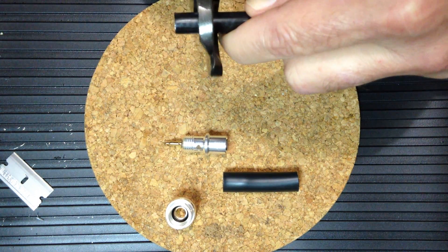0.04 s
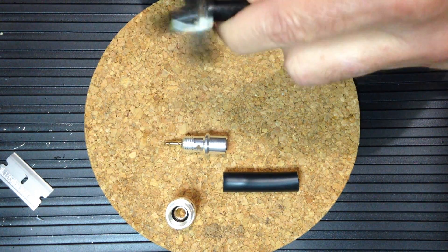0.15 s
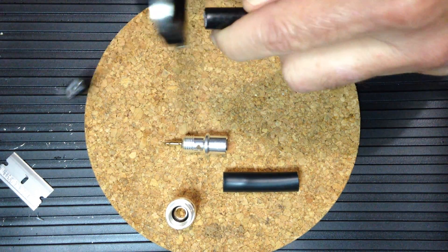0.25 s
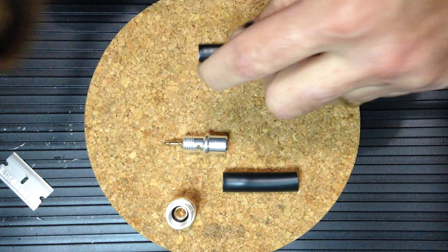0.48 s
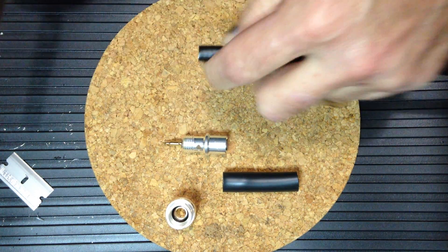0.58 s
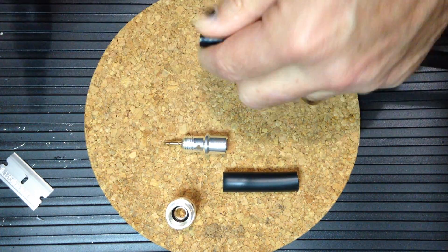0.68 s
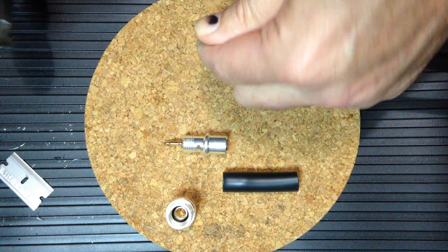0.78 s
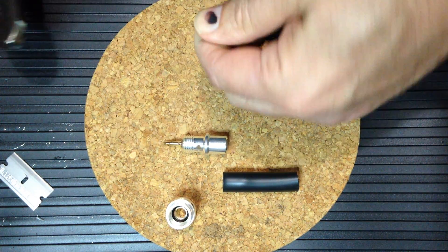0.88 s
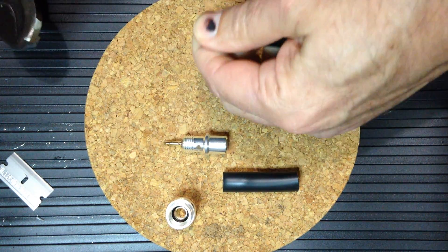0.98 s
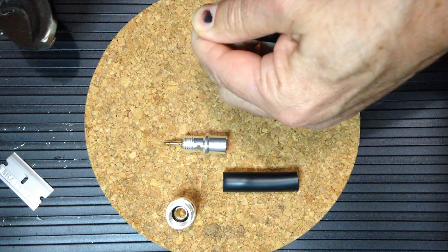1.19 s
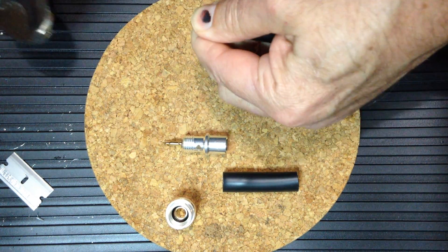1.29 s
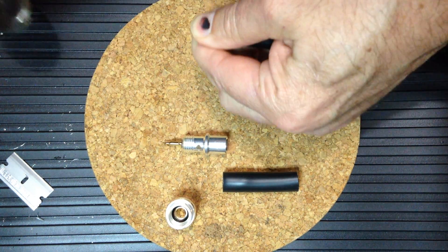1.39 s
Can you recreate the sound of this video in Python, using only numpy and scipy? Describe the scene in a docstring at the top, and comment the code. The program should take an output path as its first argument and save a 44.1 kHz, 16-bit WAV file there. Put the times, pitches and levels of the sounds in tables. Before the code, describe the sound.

Hand cutters crunch briefly into a thick cable and snap through at about 0.25 seconds, sharp and bright, the steel ringing briefly in a small room. The offcut knocks onto the bench mat and tumbles around 0.4 seconds. From 0.5 to 0.7 the cable ticks and creaks softly in the fingers. Faint taps and a soft bump follow near 1.1 seconds, over a low room hum.

```python
"""A faint tick, a short crunch, then a sharp snap: hand cutters bite through a thick coaxial cable.
The braid breaks strand by strand; the jaws shut and chatter, and their steel and a small live room ring.
The offcut lands on the workbench mat and tumbles, each impact exciting the modes of mat and bench.
Then the cable ticks and creaks softly in the fingers, over a low room hum."""
import sys
import numpy as np
from scipy import signal
from scipy.fft import rfft, irfft, next_fast_len
from scipy.io import wavfile

SR = 44100
rng = np.random.default_rng(int(sys.argv[2]) if len(sys.argv) > 2 else 0)


def generate_wav(signal):
    """Clip the signal to [-1, 1] and save it as 16-bit WAV at the path in sys.argv[1]."""
    frames = np.transpose(np.atleast_2d(signal))
    scaled = np.clip(frames, -1, 1) * 32767
    pcm = np.round(scaled).astype(np.int16)
    wavfile.write(sys.argv[1], SR, pcm)


N = 63945
TIME = np.arange(N) / SR


def snap():
    """Impulsive excitation: the jaws break through and chatter, the steel rings and the tool jerks."""
    # jaw impacts: t/s, level/dB, T60/s, bass edge/Hz, treble edge/Hz
    impacts = [(.2359, -15, .014, 2500, 15000), (0.2371, -4.5, .018, 255.6, 15430),
               (.2388, -19.5, .014, 2464, 10000), (.2424, -10, .015, 2200, 8000),
               (.2462, -13, .014, 2200, 5500), (.2481, -16, .013, 2512, 4800)]
    # spectrum of the cracks: f/Hz, level/dB
    crack_spectrum = [(150, -12.5), (400, -12), (900, -6), (1300, -10.5), (1650, -10), (2250, -13),
                      (2700, -15.5), (3600, -2), (4400, -6), (5200, -15.5), (6600, -1.5), (7400, -9),
                      (8700, -9), (11500, -16), (14000, -11)]
    # modes of the cutters: f/Hz, level/dB, T60/s
    steel_modes = [(1630, -31, .06), (2240, -27, .1), (3590, -15, .05), (3558, -23, .36), (3655, -37, .4),
                   (3747, -37, .45), (4395, -28, .18), (5770, -32, .08), (6503, -33, .36), (6691, -32, .42),
                   (7224, -42, .36), (8689, -41, .33)]
    cracks = np.zeros(N)
    for start, db, t60, bass_hz, treble_hz in impacts:
        burst = rng.choice([-1, 1], N) * from_db(db) * decay(start, t60)
        cracks += high_pass(low_pass(burst, treble_hz), bass_hz)
    blow = np.zeros(N)
    blow[int(impacts[1][0] * SR)] = 1  # the strongest impact rings the steel
    steel = sum((-1) ** k * from_db(db) * ring(blow, hz, t60)
                for k, (hz, db, t60) in enumerate(steel_modes))
    jolt_width_s, jolt_db = .004, -29
    u = (TIME - impacts[0][0]) / jolt_width_s
    jolt = from_db(jolt_db) * (u ** 2 - 1) * np.exp(-u ** 2 / 2)  # one low pulse as the cable gives
    return colour(cracks, crack_spectrum) + steel + jolt


def snap_reverberation():
    """Reverberation holds the colour of the steel; flutter echo between near walls ripples its decay."""
    # the room's answer to the snap: f/Hz, level/dB
    spectrum = [(60, -38.5), (150, -29), (400, -22.5), (900, -17.5), (1600, -12.5), (1900, -15.5),
                (2250, -8.5), (2900, -28), (3350, -6.5), (3650, -0.5), (4000, -4), (4400, -12), (5300, -16),
                (6000, -10), (6650, -2.5), (7100, -12), (8500, -11.5), (10500, -10.5), (15000, -12.5)]
    start_s, flutter_hz, flutter_depth = .241, 81, .15
    flutter = 1 + flutter_depth * np.cos(2 * np.pi * flutter_hz * (TIME - start_s))
    return from_db(-22.8) * colour(diffuse_field(start_s) * flutter, spectrum)


def crunch():
    """Acoustic emission: jacket and braid give way under the blades in many tiny fractures."""
    # pushes of the blades: t/s, duration/s, level/dB
    pushes = [(.160, 0.033, -62.5), (.1945, 0.0047, -33), (.1985, .011, -27.5), (.206, 0.0087, -34),
              (.214, .016, -41), (.2275, .007, -28.5)]
    # breaking strands: f/Hz, level/dB
    spectrum = [(120, -20.5), (350, -18), (750, -19), (980, -0.5), (1250, -22.5), (2200, -9), (2800, -6.5),
                (3800, -3.5), (5200, -11), (8500, -1), (11000, -9), (15000, -11.5)]
    return high_pass(friction(pushes, spectrum, grains_per_s=8600), edge_hz=248)


def offcut():
    """Impacts excite damped modes: the cut end lands and tumbles; later the bench takes a soft bump."""
    # knocks on the bench: t/s, level/dB, treble edge/Hz
    knocks = [(.3575, -15.5, 1200), (.3726, -0.5, 4800), (.3752, -13, 1550), (.3772, -12, 1740),
              (.3825, -9, 1080), (.389, -17, 500), (.448, -19.5, 2420), (.4905, -23, 1990),
              (1.128, -22.5, 197)]
    # modes of mat and bench: f/Hz, level/dB, T60/s
    bench_modes = [(119, -32, 0.15), (177.4, -26, 0.072), (255, -32, 0.057), (327, -25.5, 0.054),
                   (505, -22, 0.025), (647, -17.5, 0.01), (837, -29, 0.06), (1014, -25, 0.033),
                   (1278, -29.5, 0.059), (1563, -25.5, 0.018), (2570, -25.5, 0.0077), (4500, -23, 0.0073)]
    return in_room(high_pass(strike(knocks, bench_modes), edge_hz=104), wet_db=-10.5)


def cable_ticks():
    """Heavy damping makes each small impulse in the handled cable a short tick."""
    # ticks in the fingers: t/s, level/dB, treble edge/Hz
    ticks = [(.119, -29, 1000), (.5078, 0, 14000), (.5622, -9, 3000), (.5745, -20, 2000), (.586, -19, 2500),
             (.5953, -14, 5000), (.6025, -20, 4000), (.6207, -11.5, 1900), (.639, -14, 2500),
             (.6475, -13, 2300), (.6755, -17.5, 1800), (.968, -31, 1700), (.9822, -23, 1900),
             (.9925, -23, 1900), (1.095, -26, 2500), (1.102, -31, 2000), (1.153, -30, 2000)]
    # modes of the cable: f/Hz, level/dB, T60/s
    cable_modes = [(171.44, -43, 0.05), (490, -44, .015), (930.7, -37.5, 0.0078), (1266, -24.5, .022),
                   (1614, -27.5, 0.023), (2120, -28.5, .012), (2800, -27.5, 0.0038), (4700, -26, 0.0023),
                   (7500, -33.5, 0.0021), (11700, -38, 0.0009)]
    return in_room(strike(ticks, cable_modes), wet_db=-15)


def light_taps():
    """Small bodies have high natural frequencies: a wire end flicks and a hard part taps."""
    # contacts of the part and of the wire end: t/s, level/dB, treble edge/Hz
    taps = [(1.066, -3, 9000), (1.079, -6.5, 7000), (1.0915, -0.5, 3480)]
    flick = [(1.0365, -3, 14000)]
    # their modes: f/Hz, level/dB, T60/s
    part_modes = [(2085, -46.5, 0.029), (3020, -54.5, 0.023), (3910, -53, 0.012), (6830, -56, 0.013)]
    wire_modes = [(6720, -56, 0.028), (10870, -56, 0.0068)]
    return in_room(strike(taps, part_modes) + strike(flick, wire_modes), wet_db=-12.5)


def finger_rubs():
    """Sliding friction: skin catches and slips on the jacket."""
    # finger strokes: t/s, duration/s, level/dB
    strokes = [(.10, 0.037, -70.5), (.51, 0.15, -48.5), (.68, 0.24, -78), (.85, 0.24, -66.5),
               (1.02, 0.14, -64)]
    # skin on the jacket: f/Hz, level/dB
    spectrum = [(30, -26), (60, -11), (140, 3.5), (300, -5.5), (600, -14), (980, -7), (1250, 2), (1650, -2),
                (2100, -5), (4000, -14), (8000, -20), (14000, -35)]
    return friction(strokes, spectrum, grains_per_s=3800)


def room_tone():
    """Background noise: a continuous spectrum of rumble and hiss, with a line spectrum of hum."""
    # rumble and hiss: f/Hz, level/dB
    air_spectrum = [(20, -26.5), (40, -24.5), (65, -3.5), (90, -9), (125, -4.5), (180, -8.5), (260, -14),
                    (400, -20.5), (700, -25), (1400, -32.5), (3000, -38.5), (7000, -42), (15000, -42)]
    # hum tones: f/Hz, rms level/dB
    tones = [(68, -70.5), (119, -65), (399, -76)]
    gain = from_db(at_hz(air_spectrum, np.fft.rfftfreq(N, 1 / SR)))
    air = irfft(rfft(rng.standard_normal(N)) * gain, N)
    hum = sum(from_db(db) * np.sqrt(2) * np.sin(2 * np.pi * (hz * TIME + rng.random()))
              for hz, db in tones)
    return from_db(-59) * unit_rms(air) + hum


def strike(hits, modes, spread_db=1.0):
    """Modal superposition: each contact rings all modes; a soft one barely stirs the high ones."""
    starts, db, edge_hz = np.transpose(hits)
    scatter_db = spread_db * rng.standard_normal((len(hits), len(modes)))
    out = np.zeros(N)
    for k, (hz, mode_db, t60) in enumerate(modes):
        rolloff = np.hypot(1, (hz / edge_hz) ** 2)
        clicks = np.zeros(N)
        clicks[(starts * SR).astype(int)] = from_db(db + mode_db + scatter_db[:, k]) / rolloff
        out += (-1) ** k * ring(clicks, hz, t60)
    return out


def ring(clicks, hz, t60):
    """Damped oscillator: a unit impulse starts a decaying sine of amplitude 1."""
    radius, angle = np.exp(-np.log(1000) / (t60 * SR)), 2 * np.pi * hz / SR
    return signal.lfilter([0, np.sin(angle)], [1, -2 * radius * np.cos(angle), radius ** 2],
                          clicks + 1e-18)


def friction(strokes, spectrum, grains_per_s, spread_db=5.5):
    """Shot noise: dense tiny breaks of uneven size swell and fade under each stroke."""
    sizes = from_db(spread_db * np.minimum(rng.exponential(1, N), 4)) * rng.choice([-1, 1], N)
    grains = unit_rms(sizes * (rng.random(N) < grains_per_s / SR))
    force = sum(from_db(db) * np.sin(np.pi * np.clip((TIME - start) / length, 0, 1))
                for start, length, db in strokes)
    return colour(grains * force, spectrum)


def diffuse_field(start, rise_s=.014):
    """A diffuse field builds up, then decays at its own rate in each half octave."""
    # reverberation time of the room: f/Hz, T60/s
    room_t60 = [(200, 0.26), (1300, 0.53), (3700, 0.73), (6500, .61), (9000, .48), (14000, 0.15)]
    noise, hz = rfft(rng.standard_normal(N)), np.fft.rfftfreq(N, 1 / SR)
    centres = np.geomspace(125, 16000, 15)
    out = np.zeros(N)
    for centre, share in zip(centres, np.eye(len(centres))):
        band = irfft(noise * np.interp(hz, centres, share), N)
        out += band * decay(start, at_hz(room_t60, centre))
    return out * np.clip((TIME - start) / rise_s, 0, 1)


def in_room(x, wet_db):
    """Convolution with the room's impulse response adds reverberation to the direct sound."""
    response = unit_rms(diffuse_field(0)) / np.sqrt(N)
    return x + from_db(wet_db) * signal.fftconvolve(x, response)[:N]


def colour(x, spectrum):
    """Minimum-phase filter with the given spectral shape and unit power gain."""
    size = 2 * next_fast_len(N)
    gain = unit_rms(from_db(at_hz(spectrum, np.fft.rfftfreq(size, 1 / SR))))
    cepstrum = irfft(np.log(gain))
    cepstrum[1:size // 2] *= 2  # folding onto positive time makes the filter causal
    cepstrum[size // 2 + 1:] = 0
    return irfft(rfft(x, size) * np.exp(rfft(cepstrum)))[:N]


def low_pass(x, edge_hz):
    """Second-order roll-off above the edge."""
    return signal.sosfilt(signal.butter(2, edge_hz, fs=SR, output="sos"), x + 1e-18)


def high_pass(x, edge_hz):
    """Second-order roll-off below the edge."""
    return signal.sosfilt(signal.butter(2, edge_hz, "high", fs=SR, output="sos"), x + 1e-18)


def decay(start, t60):
    """Exponential decay: a jump to 1, then a fall of 60 dB per t60."""
    return (TIME >= start) * np.exp(-np.log(1000) * np.clip((TIME - start) / t60, 0, 5))


def at_hz(points, hz):
    """Interpolation on a log-frequency axis."""
    f, value = np.transpose(points)
    return np.interp(np.log(np.maximum(hz, 1)), np.log(f), value)


def from_db(db):
    """Level to amplitude ratio."""
    return 10 ** (np.asarray(db) / 20)


def unit_rms(x):
    """Normalisation to unit power."""
    return x / np.sqrt(np.mean(x ** 2) + 1e-20)


def scene():
    """Superposition: all sources add at one microphone above the bench."""
    cut = crunch() + snap() + snap_reverberation() + offcut()
    handling = cable_ticks() + light_taps() + finger_rubs()
    return (cut + handling + room_tone())[None]


def record(dry):
    """Soft saturation rounds the highest peaks; a steep low-pass limits the bandwidth."""
    cutoff_hz = 15300
    return signal.sosfilt(signal.ellip(10, .2, 70, cutoff_hz, fs=SR, output="sos"), np.tanh(dry))


dry = scene()
out = record(dry)
generate_wav(out)
```